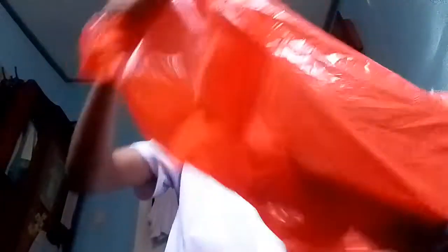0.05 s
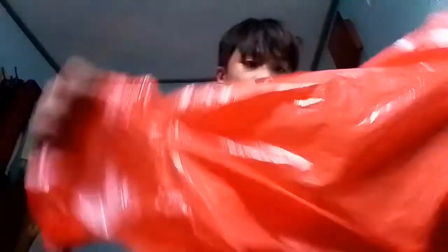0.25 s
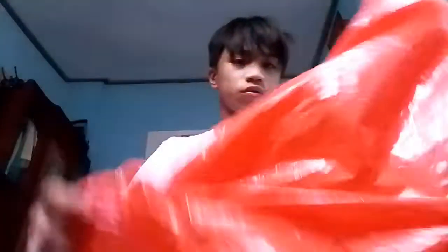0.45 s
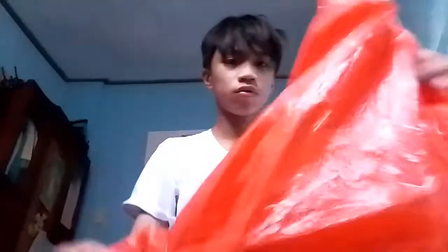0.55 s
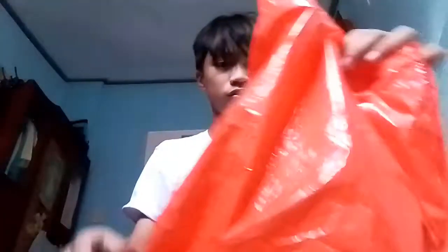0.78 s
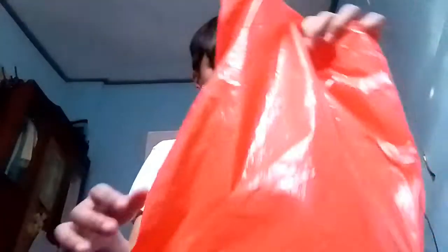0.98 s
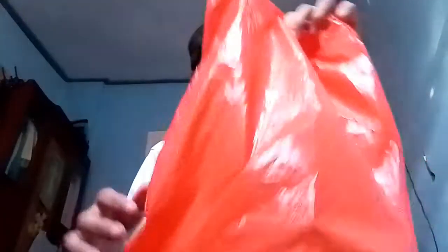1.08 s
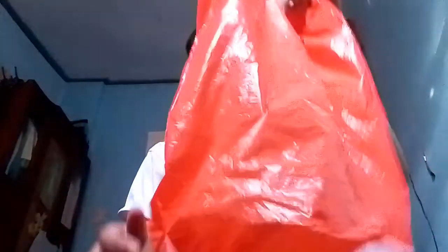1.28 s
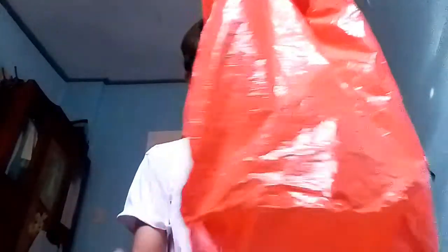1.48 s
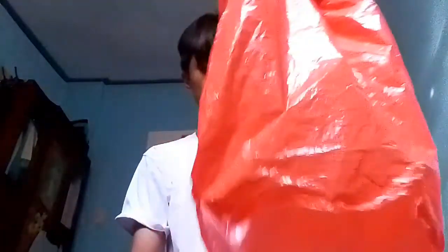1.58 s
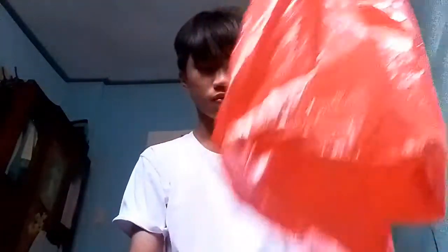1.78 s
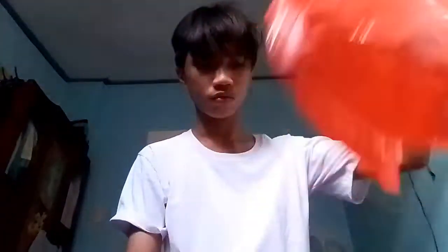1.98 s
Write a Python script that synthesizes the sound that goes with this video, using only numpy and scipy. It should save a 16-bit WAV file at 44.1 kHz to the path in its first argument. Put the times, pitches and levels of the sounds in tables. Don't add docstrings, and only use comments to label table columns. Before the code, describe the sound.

A large thin plastic bag is shaken and crinkled close to a small microphone, with bright ticks building to loud hollow snaps, a second group of pops, then faint crackles over low rumble in a small room.

```python
import sys
import numpy as np
from scipy import signal
from scipy.fft import rfft, irfft
from scipy.io import wavfile
from scipy.ndimage import uniform_filter1d

SR = 44100
rng = np.random.default_rng(int(sys.argv[2]) if len(sys.argv) > 2 else 0)


def nominal_scale(level):
    x = np.asarray(level, float) / 20
    return 10 ** x


def transcribe(signal):
    frames = np.atleast_2d(signal).T
    limited = np.clip(frames, -1, 1)
    pcm = np.round(limited * 32767).astype(np.int16)
    wavfile.write(sys.argv[1], SR, pcm)


N = 90404

# freq_hz, density_db_per_hz
ROOM_SPECTRUM = [(20, -6.5), (60, -5), (100, -3), (150, -11), (300, -29), (2200, -44.5), (6000, -64),
                 (12000, -93.5)]
# freq_hz, density_db_per_hz
AIR_SPECTRUM = [(12, -38), (20, -32.5), (59, 4.5), (248, 0.5), (278, -2.5), (400, -8.5), (520, -64.5),
                (880, -120)]
# start_s, peak_db, length_s
AIR_FLAPS = [(0.201, -37, 0.0072), (0.346, -44, 0.021), (0.465, -32, 0.026), (0.482, -32, 0.034),
             (0.597, -31, 0.026), (0.676, -21.5, 0.02), (0.756, -19.5, 0.014), (1.298, -35, 0.025),
             (1.354, -26, 0.02), (1.391, -26.5, 0.036), (1.52, -50, 0.021), (1.588, -35.5, 0.026)]
# time_s, effort_db, crispness_db, air_push_db
HANDLING_CURVE = [(0, -40, -3, -5), (.16, -43, 3, -5), (.3, -39, -0.5, -5), (.64, -28.5, 2, -3.5),
                  (.84, -39, 1.5, -1), (1.03, -38.5, 2.5, -4.5), (1.2, -41.5, 3, -7.5),
                  (1.27, -39.5, 4.5, -4), (1.4, -43.5, -4, 2.5), (1.5, -47, -2.5, -4.5),
                  (1.55, -51.5, 0.5, 7), (1.58, -52.5, -7, -2.5), (1.639, -61.5, -2, -1.5),
                  (2.05, -67, -5, 6.5)]
# centre_s, extra_effort_db,
# half_length_s
CRUMPLE_BURSTS = [(0.206, 9, 0.046), (0.354, 0.5, 0.0092), (0.447, 5, 0.027), (0.611, 3.5, 0.014),
                  (0.039, 3, 0.0024), (0.093, -1.5, 0.0057), (0.376, -3, .008), (0.417, -2.5, 0.0082),
                  (.636, -3, 0.011), (0.267, 4, 0.0093), (0.682, 6.5, 0.022), (0.733, -8.5, 0.0067),
                  (0.778, 6, 0.022), (0.824, -7.5, 0.01), (0.936, 6, 0.023), (0.961, -3.5, 0.046),
                  (1.167, 4, 0.017), (1.287, -1, 0.003), (1.3, 2, 0.018), (1.375, 5, 0.031),
                  (1.446, 5.5, 0.015), (1.488, -5.5, 0.011), (1.533, 9, 0.024), (1.629, 6, 0.0065),
                  (1.653, 2.5, 0.0068), (1.736, 1.5, .015), (1.83, 13, 0.015), (1.821, -3.5, .005),
                  (1.286, 2, .006), (0.477, 1.5, 0.019), (0.858, 2.5, 0.0028), (1.067, 3.5, .006),
                  (1.58, 2, .02), (0.797, -1.5, 0.016), (1.799, 4, 0.022), (1.877, 6, 0.0043),
                  (1.997, -3, 0.016)]
# freq_hz, density_db_per_hz
CREASE_SPECTRUM = [(1760, -27.5), (3000, -1), (3500, -2), (4290, -6), (6950, -12.5), (8170, -8),
                   (10400, -18), (14900, -30), (16000, -19.5)]
# start_s, peak_db, pitch_hz
CREASE_TICKS = [(0.1344, -17, 6700), (0.175, -25, 8200), (0.187, -26, 7990), (0.2141, -15, 8200),
                (0.2205, -13.5, 5900), (0.2469, -18, 4500), (0.2637, -17, 8300), (0.2678, -22, 6900),
                (.2756, -35, 14900), (.3498, -25.5, 8100), (0.389, -24, 5000), (0.4642, -18.5, 7740),
                (0.5814, -22, 8170), (.7415, -25, 9000), (0.9091, -20, 5400), (0.9208, -22, 8700),
                (0.9831, -20.5, 8430), (1.0623, -21, 8050), (1.0994, -18, 8260), (1.139, -22, 5640),
                (1.1597, -31, 8550), (1.189, -27, 5340), (1.229, -24.5, 7900), (1.427, -26, 4140),
                (1.964, -53.5, 3470), (1.5132, -28, 9100), (1.5169, -23, 4260), (1.735, -46.5, 3910),
                (1.986, -43, 3920), (0.0114, -24.5, 3550), (0.019, -26.5, 3300), (0.0367, -35, 5000),
                (0.0743, -23.5, 3080), (0.084, -28, 2800), (.115, -38, 4950), (0.131, -18, 2580),
                (.236, -20, 8150), (0.308, -22, 2580), (.3285, -24, 3520), (.365, -25, 3000),
                (0.4156, -25, 8200), (0.437, -19, 2940), (0.448, -31, 3000), (.496, -28, 5000),
                (.549, -22, 4500), (0.5547, -21, 5000), (.598, -20, 8000), (.748, -9.5, 5000),
                (0.764, -19, 4300), (1.035, -33, 3000), (1.1989, -30, 2500), (1.271, -27, 2500),
                (1.3554, -19.5, 4700), (1.83, -44.5, 2990), (1.835, -46, 4600), (1.92, -56, 3210),
                (0.43, -37, 2800), (0.469, -24, 3330), (.481, -25, 2590), (.6105, -20.5, 3000),
                (.586, -20.5, 2500), (1.5325, -32.5, 4220)]
# start_s, peak_db, ring_hz, ring_length_s
PANEL_SNAPS = [(0.1338, -23.5, 1290, 0.0018), (0.349, -21, 1324, 0.0027), (0.608, -21.5, 2390, 0.0028),
               (0.6686, -14.5, 870, 0.002), (0.6755, -7.5, 2080, 0.0019), (0.6826, -11.5, 1720, 0.0021),
               (0.6961, -14.5, 1490, 0.0045), (0.699, -17, 1470, 0.0032), (0.74, -9, 980, 0.0013),
               (0.7472, -0.5, 2450, 0.0011), (0.748, 1.5, 1564, 0.0031), (0.763, -13.5, 2800, 0.0043),
               (0.774, -20, 2570, 0.0018), (0.8448, -17, 2580, 0.0011), (1.2387, -26.5, 1750, 0.0036),
               (1.2896, -8.5, 1260, 0.00082), (1.293, -24, 375, 0.004), (1.307, -30, 1970, 0.0073),
               (1.3337, -17, 1280, 0.00042), (1.3405, -25.5, 890, 0.0017), (1.3433, -19.5, 3040, 0.0013),
               (1.3536, -11, 1840, 0.0015), (1.356, -15, 880, 0.0026), (1.3568, -22.5, 287, 0.011),
               (1.362, -33, 1670, 0.0034), (1.372, -27, 1850, 0.0048), (1.382, -26.5, 1700, 0.0061),
               (1.4277, -24.5, 1420, 0.00087), (1.429, -23.5, 595, 0.0025), (1.441, -24, 3140, 0.0015),
               (1.449, -30.5, 1530, 0.0046), (1.479, -26, 1550, 0.0026), (1.5179, -10.5, 1650, 0.0012),
               (1.5194, -16, 757, 0.0029), (1.5317, -11, 1610, 0.0009), (1.533, -21, 630, 0.0025),
               (1.556, -33, 1910, 0.0021), (1.603, -36, 1980, 0.0015), (1.604, -37, 420, 0.0074),
               (1.659, -43.5, 930, 0.0035), (1.8765, -45, 800, 0.0021), (1.735, -43.5, 2100, 0.0012),
               (1.9847, -44, 1760, 0.0026), (.049, -27, 1720, 0.0014), (0.192, -28, 2330, 0.0038),
               (0.429, -26, 2260, 0.0025), (.5202, -19, 1590, .002), (0.58, -31, 1480, 0.0025),
               (0.6086, -25, 2160, 0.0011), (0.617, -21, 1600, .002), (0.7412, -10, 1600, .0025)]
# freq_hz, density_db_per_hz
PANEL_SPECTRUM = [(100, -35), (300, -10), (700, -1), (1600, 0), (2600, -6), (4500, -16), (8000, -33),
                  (14000, -58)]
# freq_hz, density_db_per_hz
FILM_SPECTRUM = [(88, -19.5), (150, -4.5), (303, 4.5), (341, -1), (524, -9.5), (846, -7.5), (987, -8),
                 (2580, -4.5), (9000, -38), (11700, -54), (19800, -120)]
# freq_hz, gain_db
MIC_RESPONSE = [(1000, 0), (1550, 0.5), (2200, -0.5), (13000, -5.5), (15300, 8), (15500, 0), (15750, -40)]


def evened(x):
    return x / np.sqrt(np.mean(x ** 2) + 1e-20)


def colour(x, spectrum):
    hz = abs(np.fft.fftfreq(8192, 1 / SR))
    table_hz, table_db = np.transpose(spectrum)
    gain_db = np.interp(np.log(hz + 1), np.log(table_hz + 1), table_db)
    log_gain = np.log(nominal_scale(np.maximum(gain_db, -100)))
    taps = np.fft.ifft(np.exp(np.conj(signal.hilbert(log_gain)))).real[:4096]
    return signal.oaconvolve(x, taps / np.linalg.norm(taps))[:len(x)]


def wander(smooth_s):
    size = max(int(smooth_s * SR), 2)
    once = uniform_filter1d(rng.standard_normal(N), size)
    return evened(uniform_filter1d(once, size))


def clicks(per_s, spread_db):
    struck = rng.random(N) < per_s / SR
    size = np.minimum(rng.exponential(1, N), 4)
    sign = rng.choice([-1, 1], N)
    return evened(struck * nominal_scale(spread_db * size) * sign)


def add(mix, start_s, sound):
    part = mix[max(round(start_s * SR), 0):][:len(sound)]
    part += sound[:len(part)]


def control(column):
    rows = np.array(HANDLING_CURVE)
    return np.interp(np.arange(N) / SR, rows[:, 0], rows[:, column])


def effort():
    t = np.arange(N) / SR
    bursts_db = sum(db * np.exp(-((t - s) / half_s) ** 2) for s, db, half_s in CRUMPLE_BURSTS)
    return control(column=1) + bursts_db


def room_tone():
    room_db, hum_db, hum_hz, hum_width_hz = -50, -55, 140, 2
    swell_peak_db, swell_s, swell_half_s = 8.5, 2.006, 0.2
    t = np.arange(N) / SR
    rumble = evened(colour(rng.standard_normal(N), ROOM_SPECTRUM))
    turn = np.exp(2j * np.pi * hum_hz * t)
    pole = np.exp(-np.pi * hum_width_hz / SR)
    hum = (turn * signal.lfilter([1], [1, -pole], rng.standard_normal(N) / turn)).real
    swell_db = swell_peak_db * np.exp(-((t - swell_s) / swell_half_s) ** 2)
    return nominal_scale(room_db) * rumble + nominal_scale(hum_db + swell_db) * evened(hum)


def walls(x):
    t60_s, spacing = 0.22, 22
    taps = np.zeros(SR // 2)
    at = np.arange(200, len(taps) - spacing, spacing)
    taps[at + rng.integers(0, spacing, len(at))] = rng.choice([-1., 1.], len(at))
    decay = nominal_scale(-60 * np.arange(len(taps)) / SR / t60_s)
    taps = signal.lfilter([1], [1, -.5], taps * decay)
    return signal.fftconvolve(x, taps / np.linalg.norm(taps))[:N]


def air():
    air_db, follow, pivot_db, lump_db, flap_db = -2.5, 0.8, -35, 1.5, -1
    level_db = pivot_db + follow * (effort() - pivot_db) + control(column=3) + air_db
    level_db += lump_db * wander(0.06)
    out = evened(colour(rng.standard_normal(N), AIR_SPECTRUM)) * nominal_scale(level_db)
    for start_s, db, length_s in AIR_FLAPS:
        u = np.linspace(0, 1, max(int(length_s * SR), 9))
        window = np.sin(np.pi * u ** 0.53) ** 2
        add(out, start_s, -nominal_scale(db + flap_db) * np.sin(3 * np.pi * u) * window)
    return out


def creases(clump):
    crease_db, hiss_db = -9, -4
    drive = clicks(per_s=1500, spread_db=2) + nominal_scale(hiss_db) * rng.standard_normal(N)
    lumps_db = 1.63 * clump + 2.3 * wander(0.0068)
    level_db = effort() + control(column=2) + crease_db
    return evened(colour(drive * nominal_scale(lumps_db), CREASE_SPECTRUM)) * nominal_scale(level_db)


def ticks():
    tick_db, ring_db, decay_s, rise_s = -4, 0.5, 0.00059, 0.0004
    out, t = np.zeros(N), np.arange(600) / SR
    envelope = np.exp(-t / decay_s) * np.minimum(t / rise_s, 1)
    for start_s, db, hz in CREASE_TICKS:
        crack = colour(rng.standard_normal(len(t)), CREASE_SPECTRUM)
        ring = nominal_scale(ring_db) * np.sin(2 * np.pi * hz * t)
        add(out, start_s, nominal_scale(db + tick_db) * (crack + ring) * envelope)
    return out


def snaps():
    snap_db, rise_ratio, sag, rattle_db = -0.5, 0.23, 0.028, -9
    crack_db, crack_s, tail_db, tail_s = -17, 0.00098, -10.5, 0.013
    push_db, push_max_db, push_hz, push_s = -14, -11, 574, 0.0046
    crack_spectrum = CREASE_SPECTRUM[:-3] + [(12000, -46)]
    out, t = np.zeros(N), np.arange(4000) / SR
    for start_s, db, hz, length_s in PANEL_SNAPS:
        n = rng.standard_normal(len(t) + 2)
        u = t / max(length_s, 0.0005)
        rise = 1 - np.exp(-t / (rise_ratio * length_s))
        film = colour(n[2:], PANEL_SPECTRUM)
        excess_db = min(push_max_db - db, 0)
        ring = -np.sin(2 * np.pi * hz * t * (1 - sag * np.minimum(u, 2)))
        ring += nominal_scale(rattle_db + 0.5 * excess_db) * film
        ring += nominal_scale(crack_db) * colour(n[:1:-1], crack_spectrum) * np.exp(-t / crack_s)
        bag_hz = push_hz * np.exp(0.2 * n[0])
        push = -nominal_scale(push_db + excess_db) * np.sin(2 * np.pi * bag_hz * t) * np.exp(-t / push_s)
        shiver = nominal_scale(tail_db - 60 * t / tail_s) * film
        add(out, start_s, nominal_scale(db + snap_db) * rise * (ring * np.exp(-u ** 2) + push + shiver))
    return out


def crackle(clump):
    clump_db, rustle_db, patches = 2, -8, 16
    train = clicks(per_s=2500, spread_db=0.5)
    patch = rng.integers(0, patches, N)
    out, t = np.zeros(N), np.arange(300) / SR
    for k, hz in enumerate(np.geomspace(500, 5000, num=patches)):
        ring = np.cos(2 * np.pi * hz * t) * np.exp(-t * hz / 0.97)
        ring[0] += 1.5
        out += signal.oaconvolve(train * (patch == k), ring / np.linalg.norm(ring))[:N]
    drive = evened(out) + nominal_scale(rustle_db) * rng.standard_normal(N)
    return evened(colour(drive * nominal_scale(clump_db * clump), FILM_SPECTRUM)) * nominal_scale(effort())


def scene():
    wet_db = -16
    clump = wander(0.0037)
    bag = crackle(clump) + creases(clump) + snaps() + ticks()
    return (bag + nominal_scale(wet_db) * walls(bag) + air() + room_tone())[None]


def low_pass(x):
    return signal.sosfilt(signal.butter(12, 16050, fs=SR, output="sos"), x)


def record(dry):
    offset = 0.0074
    hz = np.fft.rfftfreq(2 * N, 1 / SR)
    mic_hz, mic_db = np.transpose(MIC_RESPONSE)
    heard = irfft(rfft(dry, 2 * N) * nominal_scale(np.interp(hz, mic_hz, mic_db)))[:, :N]
    return low_pass(np.clip(heard + offset, -1, 1))


dry = scene()
out = record(dry)
transcribe(out)
```